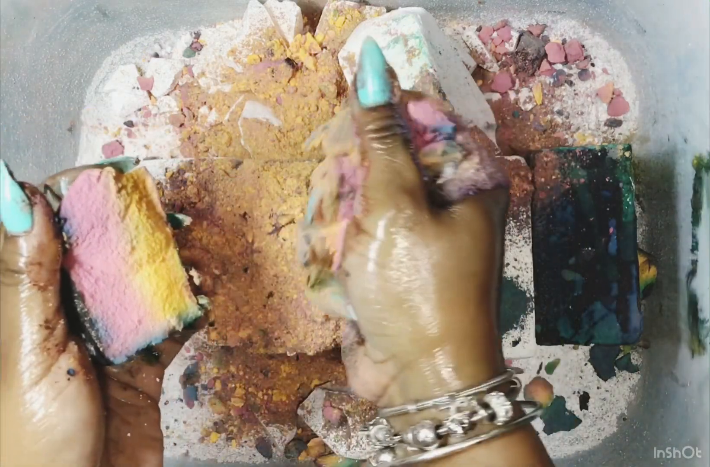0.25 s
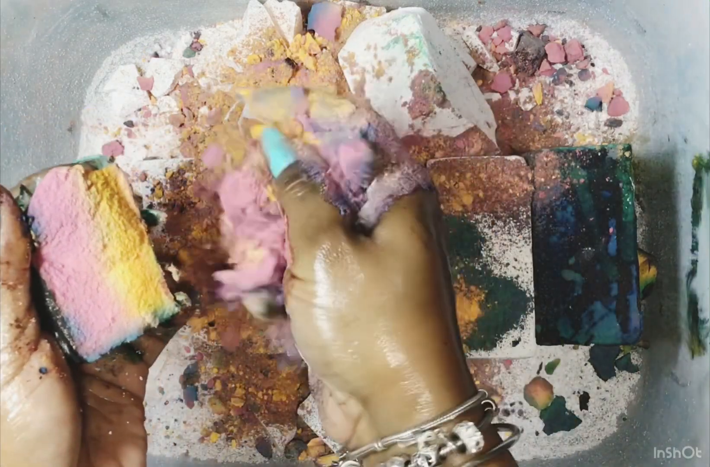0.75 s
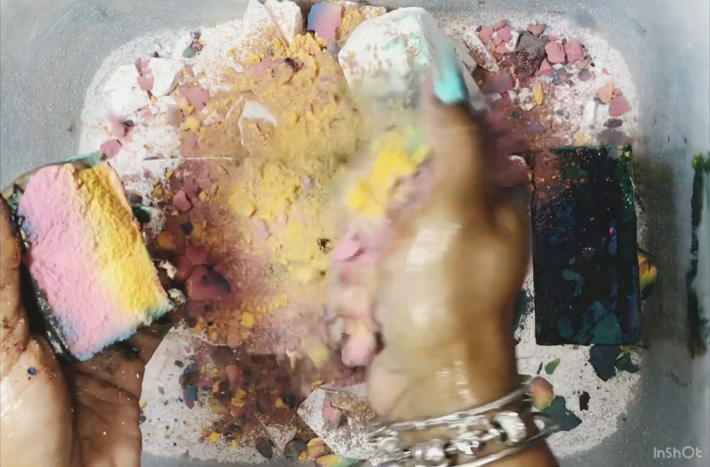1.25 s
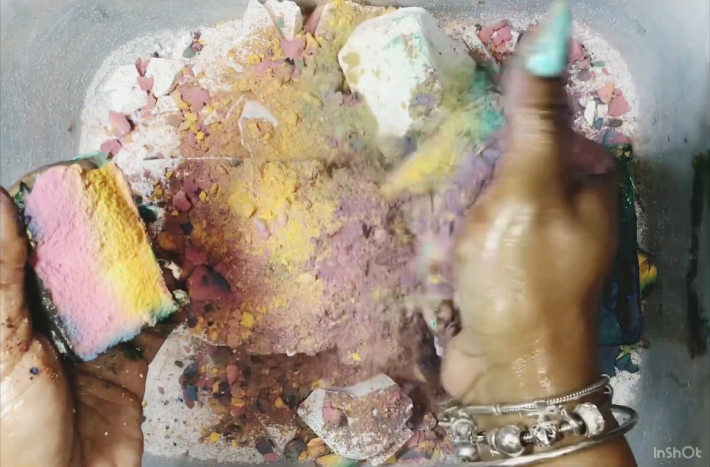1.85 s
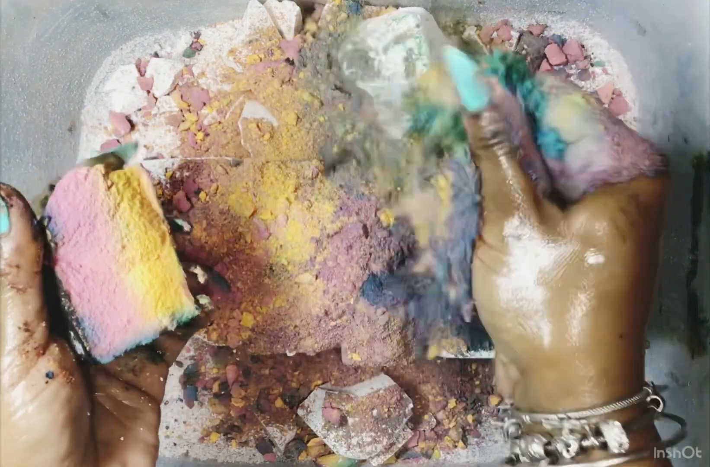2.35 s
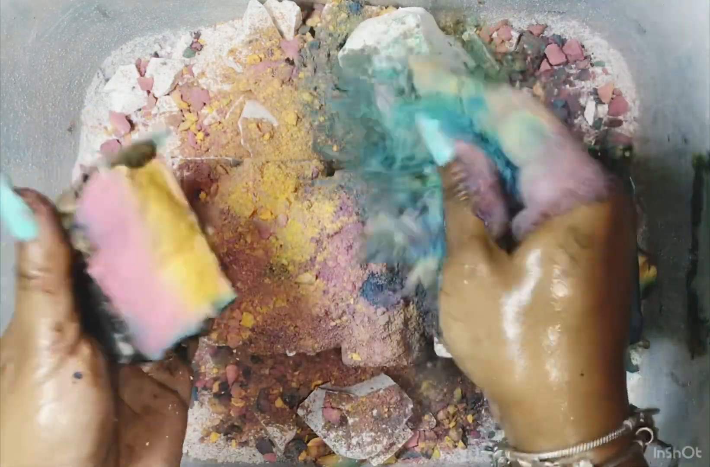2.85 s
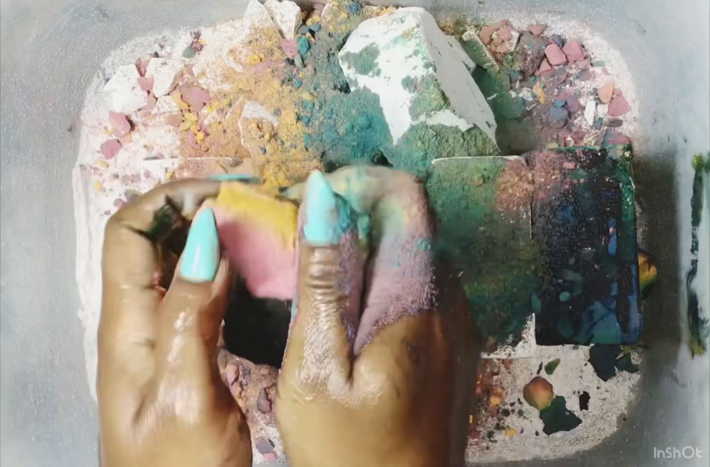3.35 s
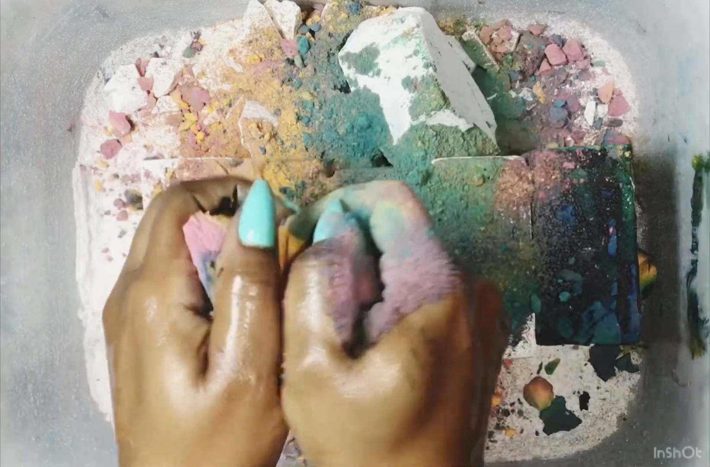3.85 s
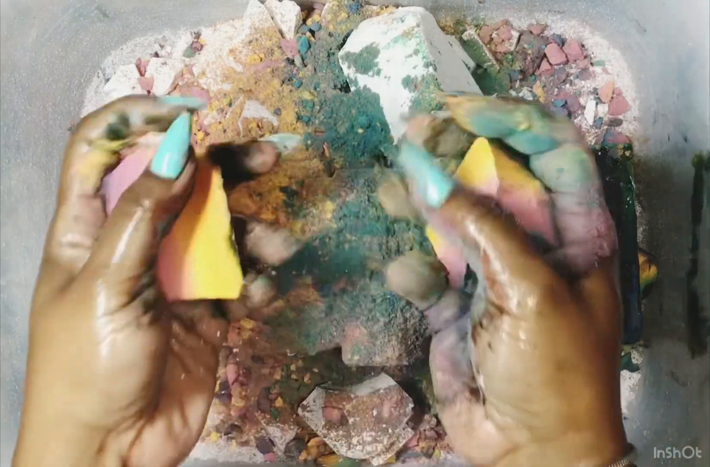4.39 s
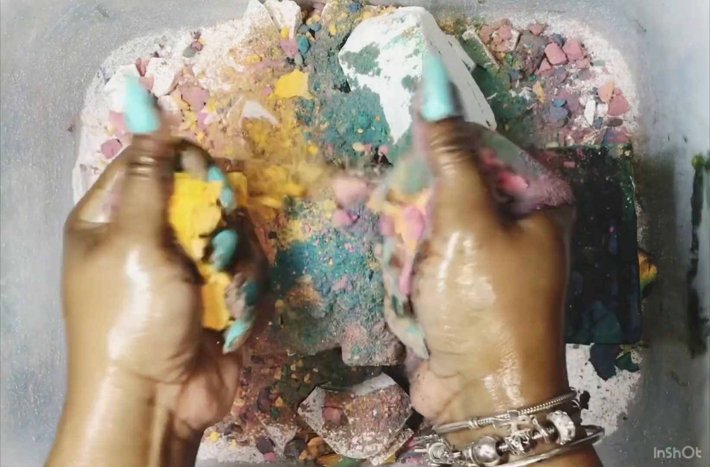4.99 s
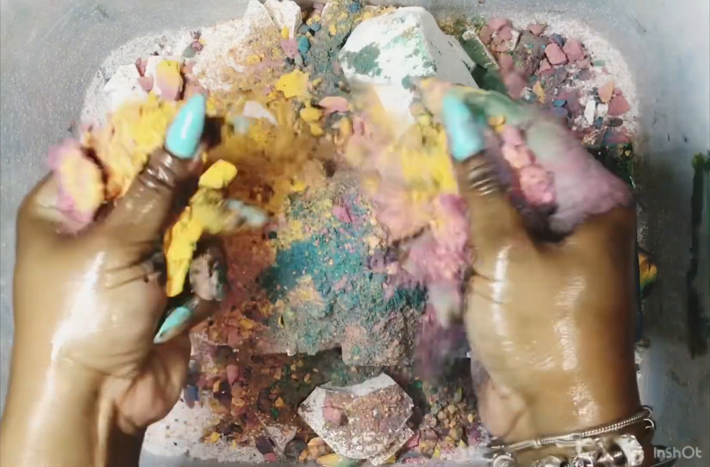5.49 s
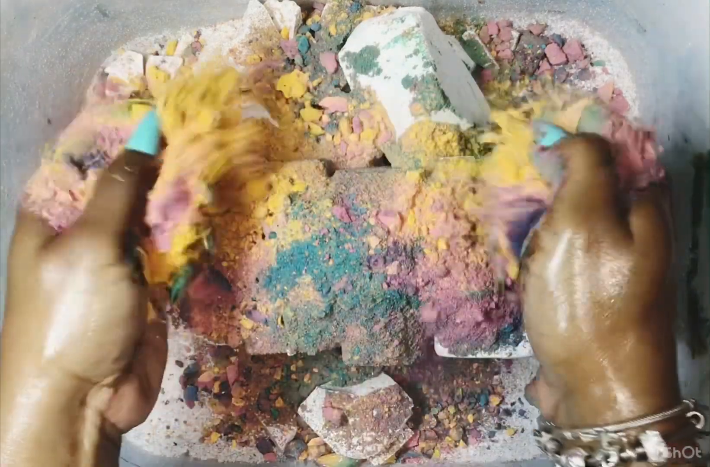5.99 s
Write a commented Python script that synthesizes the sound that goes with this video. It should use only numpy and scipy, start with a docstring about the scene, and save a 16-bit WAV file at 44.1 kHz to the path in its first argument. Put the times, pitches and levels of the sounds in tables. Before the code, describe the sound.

Close to the microphone, hands squeeze soft chalk in short bursts of dry, gritty grinding. Crumbs patter and lumps drop with dull hollow knocks on a powder-covered plastic tub. A quieter middle has finer rubbing and faint crumbling, then a few bright snaps and a bump as a block breaks, followed by renewed crunching and a heavy late thud. Low mains hum and faint hiss fill a small, quiet room.

```python
"""Soft gym chalk snaps and grinds to powder as hands crush it over a plastic tub, close to the microphone.
Lumps and crumbs knock on the chalk bed, ring the tub's modes and thump its floor; skin rubs, thin metal rings.
Powder and cracks are filtered clicks and noise; knocks, rings and thumps are decaying resonances.
Nudges sway the tub over a low rumble; mains hum and a faint hiss fill the small, quiet room."""
import sys
import numpy as np
from scipy import signal
from scipy.fft import rfft, irfft, next_fast_len
from scipy.io import wavfile

SR = 44100
rng = np.random.default_rng(int(sys.argv[2]) if len(sys.argv) > 2 else 0)


def put_to_file(sound):
    """Save the sound as 16-bit audio at rate SR, in the file named by the first command-line argument."""
    columns = np.atleast_2d(sound).T  # one column per channel
    safe = np.clip(columns, -1, 1)
    whole_steps = np.round(safe * 32767)
    wavfile.write(sys.argv[1], SR, whole_steps.astype(np.int16))


N = 274743
TIME = np.arange(N) / SR   # seconds
FLOOR_HZ, ROCK_HZ = 134.2, 45   # pitch of the tub's floor, and of the whole tub rocking on the table

# Ring of the chalk-laden tub. Each row: mode in Hz, level in dB, decay t60 in s before any extra damping.
TUB_MODES = [(125.7, 5.5, 0.34), (214.7, 3.5, 0.034), (272, -2.5, 0.086), (366, 0, 0.039),
             (459.4, -6.5, 0.072), (563.6, 2, 0.031), (639, -10, 0.11), (737, -6, 0.029), (923, -14, 0.13),
             (1078, -3, 0.028), (1177, -5, 0.063), (1292, -0.5, 0.033), (1388, -7.5, 0.097),
             (1760, -13, 0.069)]
# Spectrum of the grit in a contact. Each row: frequency in Hz, level in dB per Hz.
CRACK_SPECTRUM = [(900, -3.5), (1500, 15), (2000, 12), (2700, 13.5), (3300, 7), (4100, 10), (5000, -33),
                  (8000, -13), (15000, -55)]
# Spectrum of breaking and rubbed chalk. Each row: frequency in Hz, level in dB per Hz.
FRACTURE_SPECTRUM = [(900, -3), (2000, 2), (2700, 6.5), (3300, -1.5), (4100, 5.5), (5200, -4.5), (6300, 0),
                     (9500, 0), (11000, -1.5), (13000, -3.5), (15800, -12)]


def from_db(db):
    """Decibels to gain."""
    return 10 ** (np.asarray(db) / 20)


def rms_one(x):
    """Scale to unit rms."""
    return x / np.sqrt(np.mean(x ** 2) + 1e-20)


def peak_one(x):
    """Scale to unit peak."""
    return x / (np.abs(x).max() + 1e-20)


def add(track, s, sound):
    """Mix a sound into the track from time s on."""
    i = max(int(s * SR), 0)
    track[i:i + len(sound)] += sound[:N - i]


def fade(t60, size=8192):
    """An exponential decay, as long as one event (size in samples)."""
    return np.exp(-np.log(1000) * TIME[:size] / max(t60, 1e-3))


def burst(t60):
    """Noise that dies away."""
    decay = fade(t60)
    return decay * rng.standard_normal(len(decay))


def cut(x, hz, kind, order=2):
    """Butterworth low- or high-pass."""
    sections = signal.butter(order, min(hz, .45 * SR), kind, fs=SR, output="sos")
    return signal.sosfilt(sections, x + 1e-18)


def resonance(x, hz, width_hz):
    """Two-pole band-pass with a gain of about 1 on top."""
    r = np.exp(-np.pi * width_hz / SR)
    zeros = np.array([1, 0, -1]) * (1 - r * r) / 2
    poles = [1, -2 * r * np.cos(2 * np.pi * hz / SR), r * r]
    return signal.lfilter(zeros, poles, x + 1e-18)


def colour(x, spectrum):
    """Causal (minimum-phase) filter with the given spectrum."""
    size = 2 * next_fast_len(len(x))
    hz, db = np.transpose(spectrum)
    log_hz = np.log(np.fft.rfftfreq(size, 1 / SR) + 1)
    gain = from_db(np.interp(log_hz, np.log(hz), db))
    # folding the cepstrum forward in time gives the minimum phase
    cepstrum = irfft(np.log(gain))
    cepstrum[1:size // 2] *= 2
    cepstrum[size // 2 + 1:] = 0
    return irfft(rfft(x, size) * np.exp(rfft(cepstrum)), size)[:len(x)]


def drift(rate):
    """Random wandering of spread 1, with a new target rate times a second."""
    return rms_one(np.interp(TIME * rate, np.arange(4096), rng.standard_normal(4096)))


def grains(per_s, spread_db):
    """Random clicks, many small and a few large."""
    loudness_db = spread_db * np.minimum(rng.exponential(1, N), 4.5)
    sizes = from_db(loudness_db) * rng.choice([-1, 1], N)
    return sizes * (rng.random(N) < per_s / SR)


def jerky(sound, jerk_db, size=32):
    """Chalk gives way in steps of under a millisecond, each with its own strength."""
    steps = np.repeat(rng.standard_normal(len(sound) // size), size)
    return sound * from_db(jerk_db * steps)


def background(waver_db=2.37, hiss_db=-47, mains_hz=60):
    """Mains harmonics that waver in level, over an even hiss of filtered noise."""
    # Each row: multiple of the mains frequency, rms level in dB before the waver.
    harmonics = [(1, -28.5), (2, -85.5), (3, -52), (4, -59)]
    # Spectrum of the hiss. Each row: frequency in Hz, level in dB per Hz.
    air_spectrum = [(100, -16.5), (200, -17.5), (400, -21.5), (800, -29.5), (1250, -27.5), (1800, -34.5),
                    (4100, -34), (5200, -37.5), (9000, -34), (11000, -36), (16000, -39)]
    hum = 0
    for multiple, db in harmonics:
        cycles = round(multiple) * mains_hz * TIME
        hum = hum + from_db(db) * np.sqrt(2) * np.sin(2 * np.pi * (cycles + rng.random()))
    air = rms_one(colour(cut(rng.standard_normal(N), 62, "high"), air_spectrum))
    return hum * from_db(waver_db * drift(6)) + from_db(hiss_db) * air


def rocking(top_hz=130):
    """Hand movements reach the microphone through the table as a low rumble of filtered noise."""
    # How the handling rumble swells and sinks. Each row: time in seconds, level in dB.
    swells = [(0, -34.5), (.5, -28.5), (.7, -30), (1.15, -19.5), (1.4, -26), (2.1, -31), (2.9, -31),
              (3.55, -21), (3.85, -36.5), (4.2, -25.5), (4.4, -34.5), (5.6, -33), (6.02, -25.5),
              (6.23, -30.5)]
    # Spectrum of the rumble. Each row: frequency in Hz, level in dB per Hz.
    rumble_spectrum = [(15, 0), (28, 2), (40, -4.5), (56, 2), (78, -23.5), (105, -10), (140, -24),
                       (200, -35), (350, -65.5)]
    s, db = np.transpose(swells)
    rumble = cut(colour(rng.standard_normal(N), rumble_spectrum), top_hz, "low")
    return from_db(np.interp(TIME, s, db)) * rms_one(rumble)


def thumps(blows, hz, width_hz, soft_hz):
    """A softened push makes the tub swing; its load damps the swing."""
    out = np.zeros(N)
    push = cut(signal.unit_impulse(len(fade(1))), soft_hz, "low")
    swing = peak_one(resonance(resonance(push, hz, width_hz), hz, width_hz))
    for s, db in blows:
        add(out, s, from_db(db) * swing)
    return out


def tub_sway():
    """The hands nudge the whole tub, which rocks on the table."""
    # Each row: start in seconds, peak level in dB.
    nudges = [(.445, -20), (.49, -13.5), (.903, -12), (1.023, -15), (1.139, -11), (1.178, -10),
              (1.236, -10), (3.18, -17), (3.26, -20), (3.519, -4.5), (4.001, -8.5), (5.93, -9), (6.0, -13)]
    return thumps(nudges, ROCK_HZ, width_hz=36, soft_hz=116)


def floor_thumps():
    """The tub's floor flexes under a heavy lump."""
    # Each row: start in seconds, peak level in dB.
    blows = [(.137, -29), (.576, -13.5), (1.217, -20), (1.456, -16), (1.504, -19), (3.729, -23.5),
             (4.004, -16), (5.303, -21), (5.902, -6.5), (5.948, -17)]
    return thumps(blows, FLOOR_HZ, width_hz=45.6, soft_hz=236)


def drumming(crumb_db, per_s=150, width_hz=45, above_crumbs_db=1):
    """The falling crumbs keep the tub's floor drumming softly."""
    drops = grains(per_s, spread_db=6.5)
    drum = resonance(resonance(drops, FLOOR_HZ, width_hz), FLOOR_HZ, width_hz)
    return from_db(crumb_db + above_crumbs_db) * rms_one(drum)


def bangles(jolts, width_hz=28):
    """Each snap jolts the wrist and sets thin metal, probably bangles, ringing faintly."""
    # Each row: ringing pitch in Hz, level in dB relative to the jolt.
    metal_modes = [(7045, -11), (8779, 0), (12592, 7), (13331, 5), (13778, 4), (14876, 4)]
    return sum(from_db(db) * resonance(jolts, hz, width_hz) for hz, db in metal_modes)


def strokes(per_s=2600, spread_db=0.1, focus_db=7, focus_width_hz=4500, low_edge=0.21):
    """Skin slides over chalk: each stroke is a swell of fine, dense grit."""
    # Each row: middle in seconds, half length in s, rms level in dB before the swell, emphasised pitch in Hz.
    slides = [(0.272, 0.027, -45.5, 9550), (2.388, 0.074, -45.5, 8400), (2.574, 0.082, -43, 8800),
              (2.712, 0.014, -35, 8080), (2.976, 0.062, -40.5, 8800), (3.099, 0.015, -44, 8000),
              (3.299, 0.015, -40, 12900), (3.411, 0.04, -46.5, 8060), (3.519, 0.049, -40, 7400),
              (3.643, .02, -55, 12800), (3.742, 0.016, -30.5, 8360), (4.014, 0.024, -40, 8800),
              (4.097, 0.011, -44, 8000), (4.308, 0.014, -44, 5200), (4.482, 0.046, -43.5, 8400),
              (4.606, .012, -31.5, 8400), (4.76, 0.01, -47, 7940), (4.981, 0.075, -48, 7970),
              (6.061, 0.023, -43, 7900)]
    out = np.zeros(N)
    grit = colour(grains(per_s, spread_db), FRACTURE_SPECTRUM)
    for s, half_s, db, hz in slides:
        near = np.abs(TIME - s) < .2
        rub = grit[near] + from_db(focus_db) * resonance(grit[near], hz, focus_width_hz)
        rub = rms_one(cut(rub, low_edge * hz, "high"))
        swell = np.exp(-((TIME[near] - s) / half_s) ** 2)
        out[near] += from_db(db) * swell * rub
    return out


def squeezing(attack_s=.015, release_s=0.064, idle_powder_db=-79, idle_crumbs_db=-64.5):
    """The grip closes quickly, holds, then the flow dies away; gives powder and crumb levels in dB."""
    # Each row: start in seconds, time to the release in s, powder grinding in dB, crumbs raining in dB.
    squeezes = [(0.07, .05, -64, -49), (0.238, .1, -48.5, -54), (0.464, .04, -50.5, -54),
                (.575, .1, -45, -43), (0.785, 0.55, -44, -40.5), (1.389, 0.43, -47, -40),
                (1.878, .3, -51.5, -53), (2.233, .17, -45.5, -42.5), (2.51, 0.31, -52.5, -49.5),
                (2.771, .12, -67, -50.5), (2.931, 0.14, -62, -46), (3.344, .06, -48, -54.5),
                (3.444, .08, -40, -44), (3.735, 0.049, -48, -45.5), (3.9, .09, -48.5, -52),
                (4.465, 0.036, -42, -47.5), (4.711, .1, -42.5, -41.5), (4.896, .3, -51, -49.5),
                (5.256, .12, -47.5, -38.5), (5.454, .17, -48, -42), (5.654, .17, -46, -38.5),
                (5.895, .08, -44, -32), (6.03, .2, -48.5, -43)]
    # powers add up; a trace keeps trickling between squeezes
    powder_power, crumb_power = from_db(idle_powder_db) ** 2, from_db(idle_crumbs_db) ** 2
    for s, hold_s, powder_db, crumb_db in squeezes:
        closing = np.clip((TIME - s) / attack_s, 0, 1)
        release = np.exp(-np.maximum(TIME - s - hold_s, 0) / release_s)
        grip = closing * release
        powder_power = powder_power + (from_db(powder_db) * grip) ** 2
        crumb_power = crumb_power + (from_db(crumb_db) * grip) ** 2
    return 10 * np.log10(powder_power), 10 * np.log10(crumb_power)


def grinding(level_db, bright_db=-1.0, per_s=5000, spread_db=1.5, clump_db=3.5, shelf_hz=6500):
    """Thousands of tiny grains shear off in clumps as the fingers squeeze."""
    # Spectrum of the powder before the treble shelf. Each row: frequency in Hz, level in dB per Hz.
    powder_spectrum = [(880, -30), (1500, -8), (1920, -22), (2190, 8), (2720, -13), (3150, -5), (4040, 6.5),
                       (5280, 1), (8830, 2.5), (10600, -0.5), (13000, -2.5), (15200, -3), (16000, -20)]
    clumps = grains(per_s, spread_db) * from_db(clump_db * drift(260))
    powder = rms_one(colour(clumps, powder_spectrum))
    dull = cut(powder, shelf_hz, "low", order=1)
    return from_db(level_db) * (dull + from_db(bright_db) * (powder - dull))


def crumbs(level_db, per_s=330, spread_db=3.5, clump_db=3.0, tick_db=-11, damping=1.36):
    """Small crumbs patter on the bed in little showers: each ticks and stirs the tub's modes."""
    drops = grains(per_s, spread_db) * from_db(clump_db * drift(70))
    patter = 0
    for hz, db, t60 in TUB_MODES:
        width_hz = damping * np.log(1000) / (np.pi * t60)
        patter = patter + from_db(db) * resonance(drops * rng.standard_normal(N), hz, width_hz)
    ticks = rms_one(colour(drops, CRACK_SPECTRUM))
    return from_db(level_db) * (rms_one(patter) + from_db(tick_db) * ticks)


def tub_ring(contact_hz, scatter_db=3.0, per_octave_db=6.5, level_db=-20.0):
    """A contact excites mostly the modes near its own pitch, differently at each landing."""
    ring = 0
    for hz, db, t60 in TUB_MODES:
        decay = fade(t60)
        mismatch_db = per_octave_db * abs(np.log2(hz / contact_hz))
        mode_db = db - mismatch_db + scatter_db * rng.standard_normal()
        strength = from_db(mode_db) * rng.choice([-1, 1])
        ring = ring + strength * decay * np.sin(2 * np.pi * hz * TIME[:len(decay)])
    return from_db(level_db) * rms_one(ring)


def lump(db, hz, grit_db, ring_db, damping=0.28, bed_width_hz=110, soft_hz=1700,
         crack_t60=0.015, build_t60=0.0041):
    """A soft lump rebounds for a few cycles, rings the tub and sheds grit."""
    push = signal.unit_impulse(len(fade(1)))
    width_hz = bed_width_hz + damping * hz   # the powder bed soaks up the rebound
    contact = peak_one(resonance(resonance(push, hz, width_hz), hz, width_hz))
    ring = tub_ring(hz) * (1 - fade(build_t60))   # the walls take a moment to pick up the blow
    knock = cut(contact + from_db(ring_db) * ring, soft_hz, "low", order=4)
    grit = peak_one(colour(jerky(burst(crack_t60), jerk_db=-2.5), CRACK_SPECTRUM))
    late_grit = np.roll(grit, SR // 1000)   # 1 ms after the push
    return from_db(db) * knock + from_db(grit_db) * late_grit


def fragments(crumb_db, count=90, above_crumbs_db=4, scatter_db=2.5, pitch_hz=820, octaves=.3,
              grit_db=-7, ring_db=0):
    """Smaller pieces fall at random, more often and bigger when more crumbs are falling."""
    out = np.zeros(N)
    fallen = np.cumsum(from_db(crumb_db))
    moments, sizes, pitches = rng.random(count), rng.standard_normal(count), rng.standard_normal(count)
    for when, size, pitch in zip(moments, sizes, pitches):
        i = np.searchsorted(fallen, when * fallen[-1])
        db = crumb_db[i] + above_crumbs_db + scatter_db * size
        hz = pitch_hz * 2 ** (octaves * pitch)
        add(out, TIME[i], lump(db, hz, db + grit_db, ring_db))
    return out


def lumps():
    """The biggest lumps break off and land one by one."""
    # Each row: start in seconds, contact peak in dB before softening, contact pitch in Hz,
    # gritty crack peak in dB, trim of the tub ring in dB.
    landings = [(.083, -35.5, 393, -31, 8), (.135, -33, 1080, -34, 4.5), (.48, -31.5, 710, -37, 7),
                (.574, -3, 610, -32, -7), (.612, -19.5, 940, -34, 3), (.932, -15.5, 960, -11, 0.5),
                (.941, -12.5, 1086, -28, -2), (1.011, -25, 1060, -22.5, -18), (1.048, -22, 964, -30, 0),
                (1.095, -26, 810, -27.5, 9.5), (1.155, -8, 555, -18, 0), (1.199, -9, 365, -42, 0),
                (1.201, -11, 1200, -41, -10), (1.215, -2.5, 1075, -13, -3.5),
                (1.286, -25.5, 553, -22.5, 7.5), (1.44, -24, 725, -38, 7.5), (1.453, -23.5, 1098, -41, 7),
                (1.584, -8.5, 719, -40, -15), (1.602, -18.5, 832, -27, -3), (1.625, -5.5, 810, -8.5, -3),
                (1.765, -20, 795, -51, -15), (1.805, -16, 854, -21.5, -8), (2.251, -25.5, 687, -29, 4.5),
                (2.275, -23.5, 1118, -41, -5), (3.005, -16, 1210, -20, -7.5), (3.732, -7, 237, -17.5, -34),
                (3.733, -12.5, 515, -32, -19), (3.735, -10.5, 1430, -14.5, -3.5),
                (4.002, -26.5, 313, -33, -2), (4.486, -26.5, 780, -28.5, -5), (4.505, -28.5, 470, -29, 5.5),
                (4.593, -30, 490, -21.5, 14), (4.605, -31.5, 526, -22, 15.5),
                (4.688, -16.5, 1100, -15, -0.5), (4.693, -11, 1114, -25, -1.5),
                (4.704, -11.5, 815, -23, -9), (5.214, -22.5, 567, -33, 1), (5.305, -23, 347.4, -30, -5),
                (5.307, -15.5, 1153, -22, -3), (5.346, -26, 800, -39, 5.5), (5.491, -24, 848, -29.5, -2),
                (5.594, -32.5, 752, -28.5, 12), (5.662, -26, 576, -47, -5), (5.696, -25, 950, -50, 3),
                (5.891, -4.5, 355, -29, -3.5), (5.892, -11.5, 1140, -21.5, -5), (5.913, -13, 327, -21, 11),
                (5.934, -15, 345, -24, 0), (5.959, -22, 800, -25, 1), (5.973, -27, 1010, -22, -1),
                (6.034, -19, 963, -24, -2), (6.178, -17, 910, -26.5, -3)]
    out = np.zeros(N)
    for s, db, hz, grit_db, ring_db in landings:
        add(out, s, lump(db, hz, grit_db, ring_db))
    return out


def snaps(focus_db=8, focus_width_hz=4500, shed_db=-28, shed_t60=0.087, rise_t60=0.0035,
          jerk_db=3.0, low_edge=0.41):
    """A brittle crack runs through the block in jerks; loosened powder hisses with it and after it."""
    # Each row: start in seconds, rms level in dB, emphasised pitch in Hz, decay time t60 of the crack in s.
    fractures = [(0.084, -51.5, 4290, 0.081), (0.108, -45, 6840, 0.0078), (.468, -54.5, 11000, 0.014),
                 (0.575, -52.5, 7250, 0.0048), (.706, -54.5, 3900, 0.013), (.939, -44.5, 4000, 0.048),
                 (0.959, -48, 4000, .007), (1.195, -46, 4830, 0.051), (1.216, -48.5, 4500, 0.014),
                 (1.344, -52, 3840, 0.014), (1.624, -35.5, 4120, 0.018), (1.908, -53, 3920, 0.0096),
                 (2.083, -50.5, 13250, 0.016), (2.24, -52, 4180, 0.023), (2.563, -48.5, 12600, .025),
                 (2.761, -57, 10100, .02), (3.005, -50, 8800, 0.016), (3.151, -51.5, 11400, .023),
                 (3.257, -47.5, 11500, 0.061), (3.274, -42, 14800, .03), (3.395, -49, 9070, 0.014),
                 (3.602, -38, 8300, .028), (3.616, -37.5, 13200, 0.071), (3.733, -34.5, 7850, .034),
                 (4.024, -48.5, 8700, 0.042), (4.133, -51, 8400, 0.039), (4.152, -46, 8000, 0.01),
                 (4.22, -56, 8300, .018), (4.592, -48.5, 8500, 0.031), (4.687, -33, 6500, 0.0072),
                 (4.739, -50.5, 4200, 0.034), (4.825, -42, 8400, 0.011), (5.267, -48, 4060, 0.027),
                 (5.328, -49, 8950, .012), (5.913, -41.5, 4180, 0.015)]
    out = np.zeros(N)
    for s, db, hz, t60 in fractures:
        tear = jerky(burst(t60) * (1 - fade(rise_t60)), jerk_db)
        shed = from_db(shed_db) * burst(shed_t60)
        crack = colour(tear + shed, FRACTURE_SPECTRUM)
        crack = crack + from_db(focus_db) * resonance(crack, hz, focus_width_hz)
        crack = cut(crack, low_edge * hz, "high")   # small, bright fractures have little body
        add(out, s, from_db(db) * rms_one(crack))
    return out


def hollowed(x):
    """Close reflections in the tub hollow out some pitches of the chalk."""
    # Each row: pitch in Hz, width in Hz, gain at that pitch in dB.
    hollows = [(905, 88, -4.5), (3110, 79, -7.5), (3880, 89, -12), (5200, 140, -7), (6550, 260, -8.5),
               (10670, 340, -14.5), (13200, 350, 0)]
    for hz, width_hz, db in hollows:
        x = x - (1 - from_db(db)) * resonance(x, hz, width_hz)
    return x


def room(x, t60=0.28, wet_db=-17):
    """A short diffuse tail of decaying noise stands for the nearby walls."""
    # What the walls send back. Each row: frequency in Hz, level in dB.
    wall_spectrum = [(100, -2.5), (250, 7.5), (600, -2.5), (900, 8), (1300, 1), (2200, 3.5), (5000, -0.5),
                     (9000, 2.5), (16000, -6)]
    decay = fade(t60, size=22050)
    build_up = 1 - fade(0.024, size=22050)
    tail = colour(rng.standard_normal(len(decay)) * decay * build_up, wall_spectrum)
    return x + from_db(wet_db) * signal.fftconvolve(x, tail / np.linalg.norm(tail))[:N]


def scene():
    """Chalk and tub in the room, over the hum."""
    powder_db, crumb_db = squeezing()
    cracks = snaps()
    falling = lumps() + fragments(crumb_db) + crumbs(crumb_db)
    chalk = falling + cracks + strokes() + grinding(powder_db)
    floor = floor_thumps() + drumming(crumb_db)
    sway = tub_sway() + rocking()
    in_room = room(hollowed(chalk) + bangles(cracks))
    return (in_room + floor + sway + background())[None]


def record(dry, cutoff_hz=16050):
    """Peaks beyond full scale clip, then a steep low-pass cuts the top."""
    top_cut = signal.ellip(10, .1, 90, cutoff_hz, fs=SR, output="sos")
    return signal.sosfilt(top_cut, np.clip(dry, -1, 1))


dry = scene()
out = record(dry)
put_to_file(out)
```